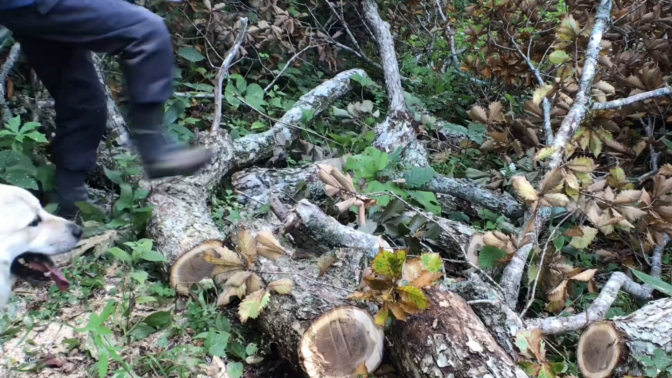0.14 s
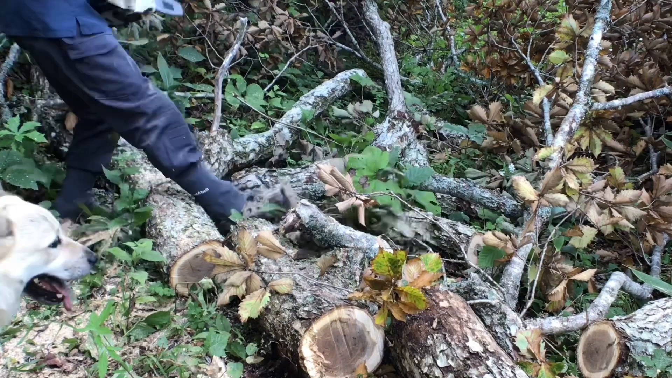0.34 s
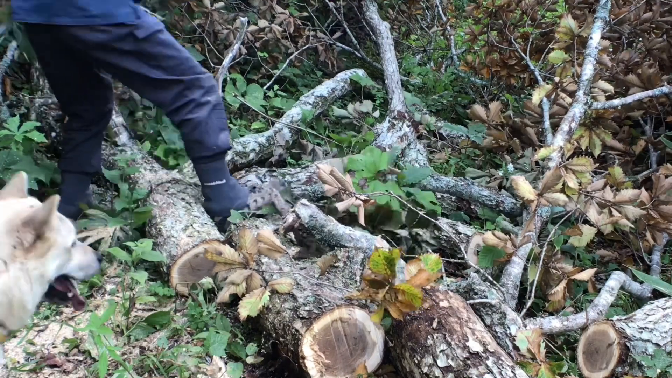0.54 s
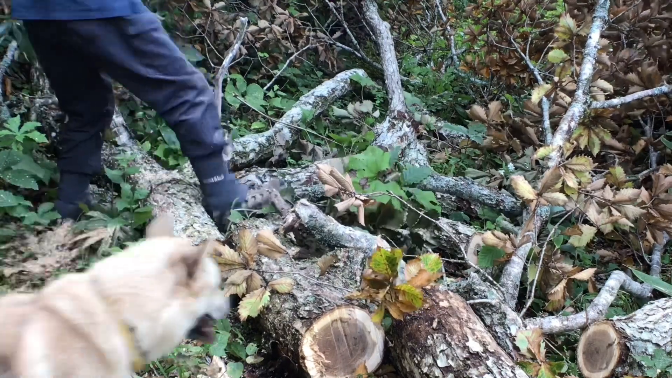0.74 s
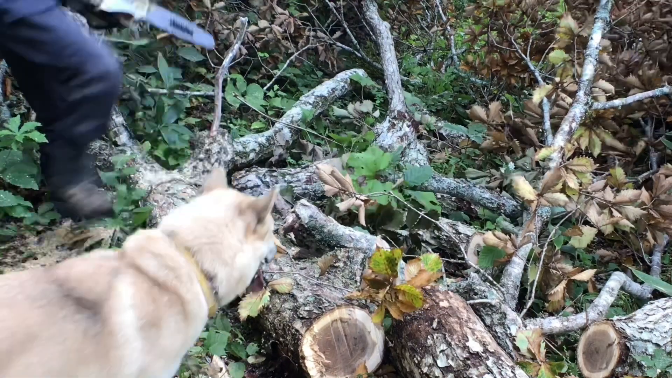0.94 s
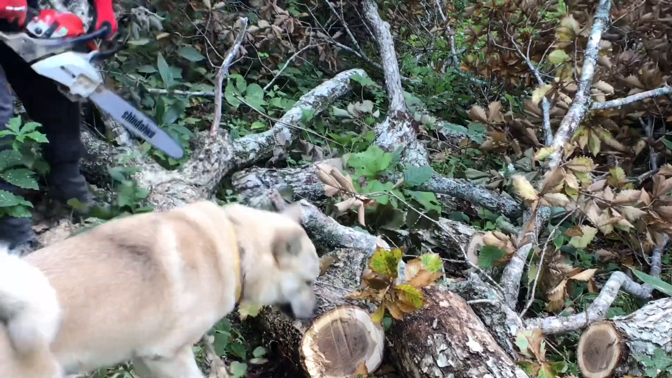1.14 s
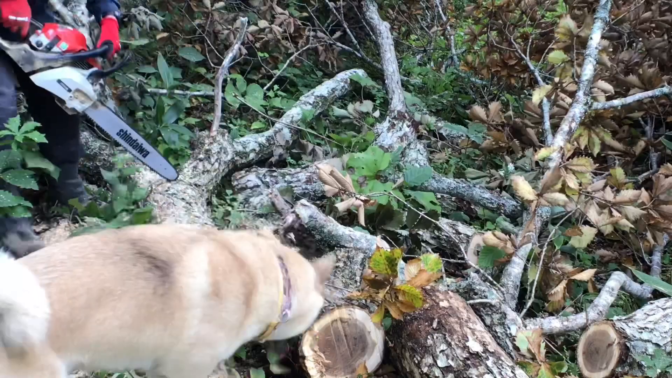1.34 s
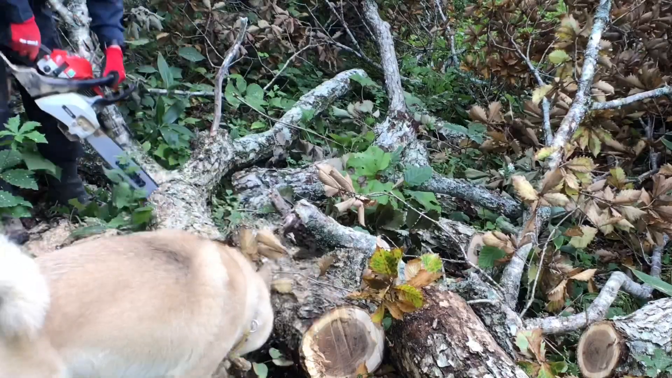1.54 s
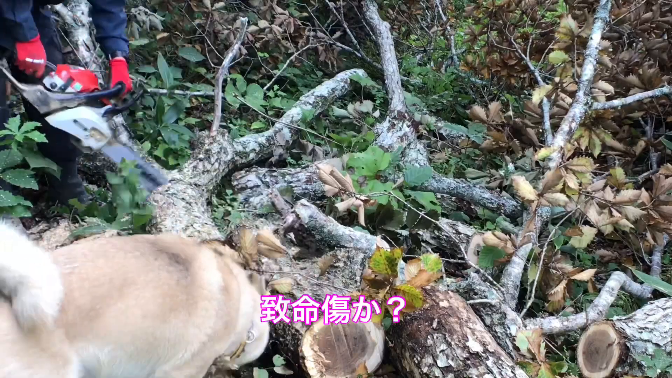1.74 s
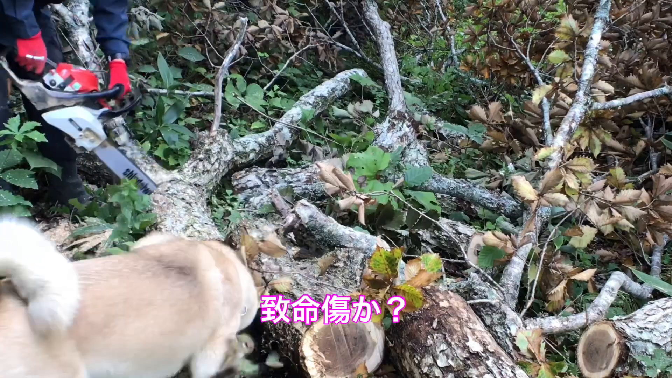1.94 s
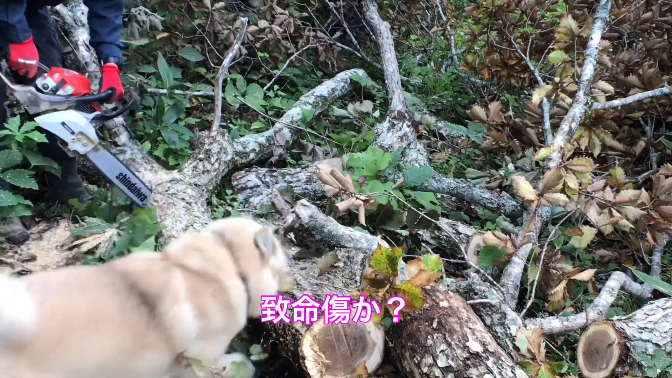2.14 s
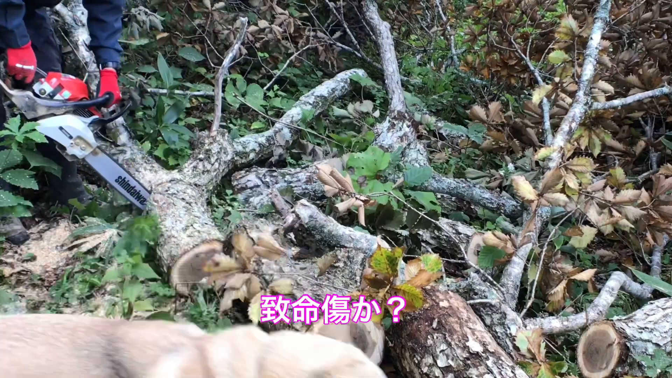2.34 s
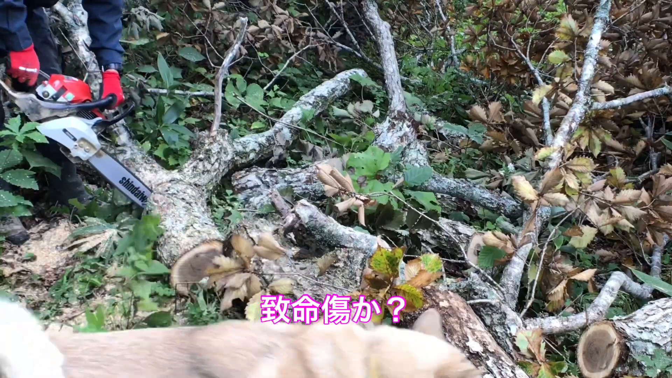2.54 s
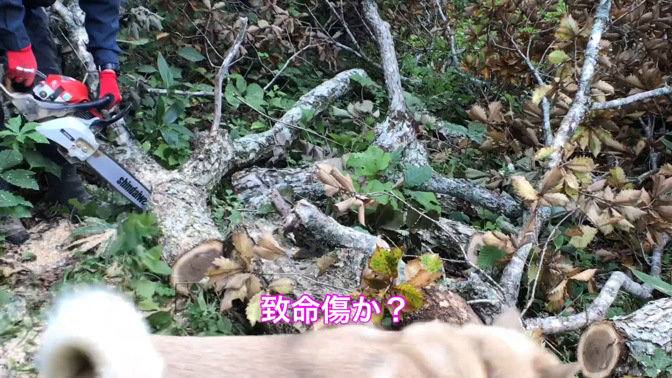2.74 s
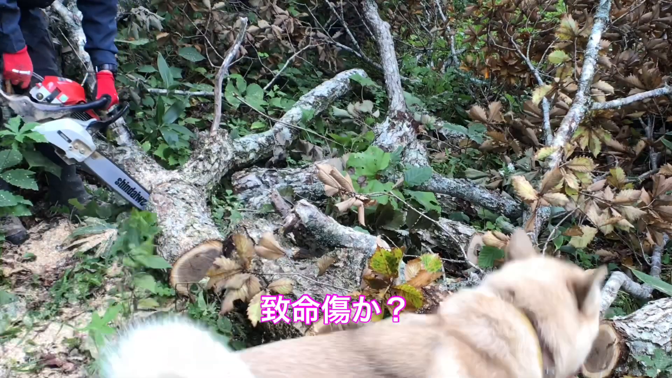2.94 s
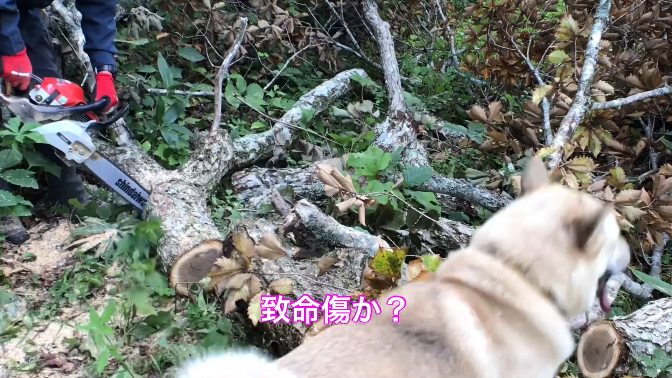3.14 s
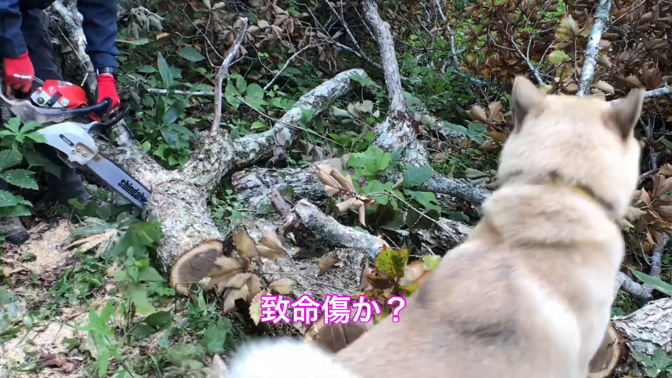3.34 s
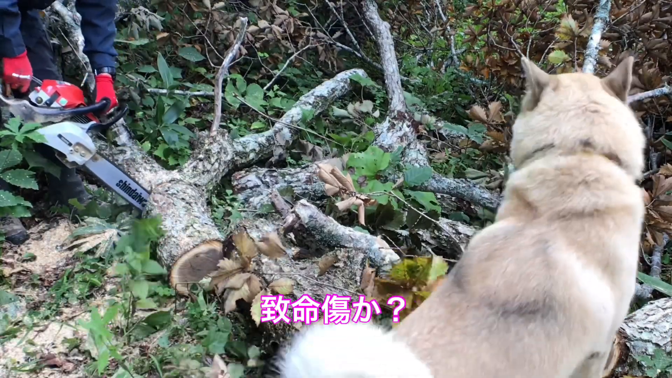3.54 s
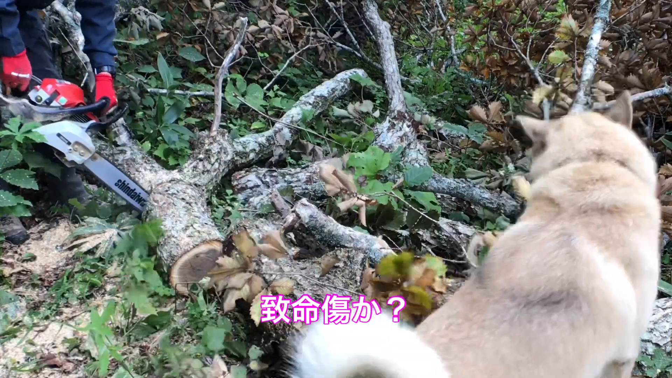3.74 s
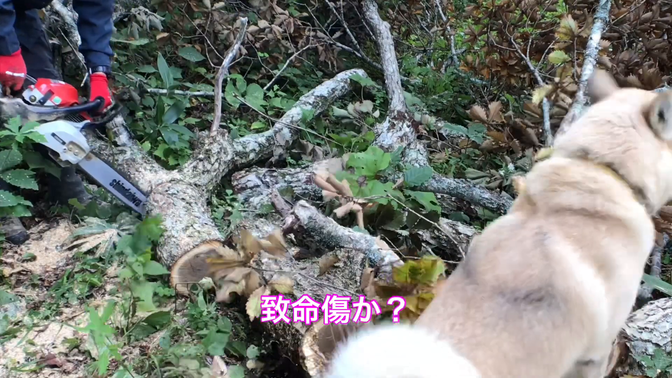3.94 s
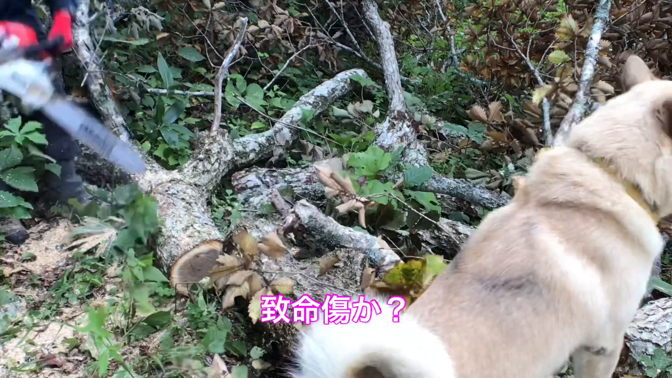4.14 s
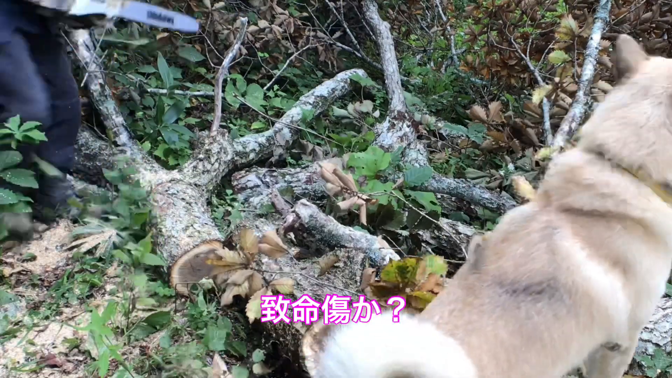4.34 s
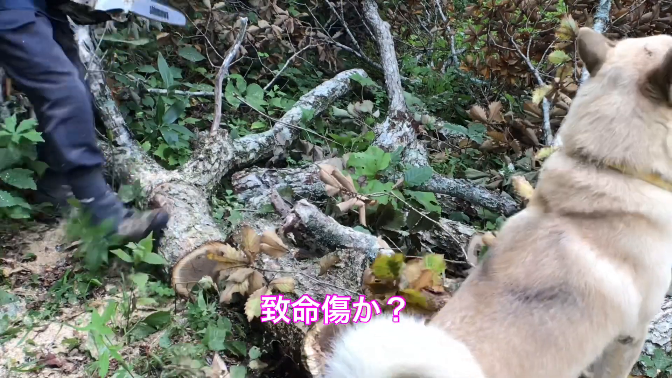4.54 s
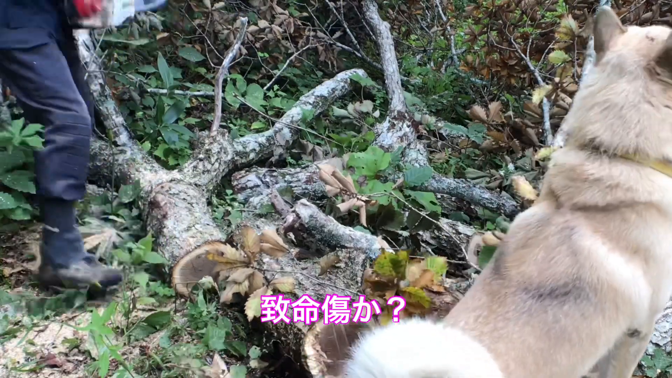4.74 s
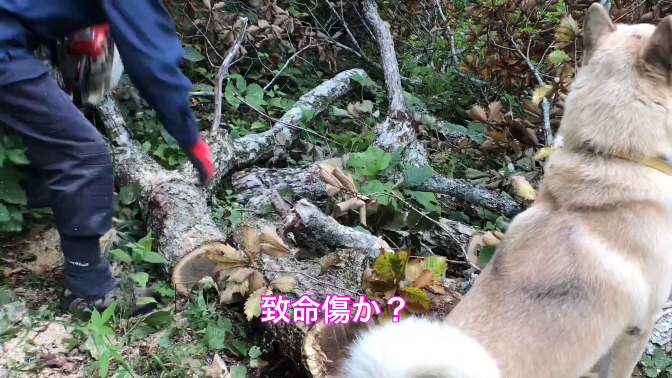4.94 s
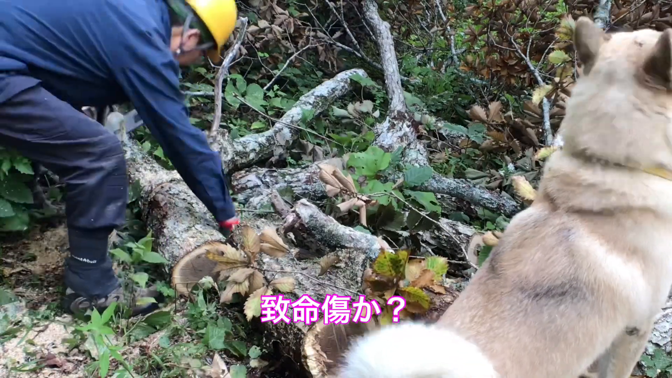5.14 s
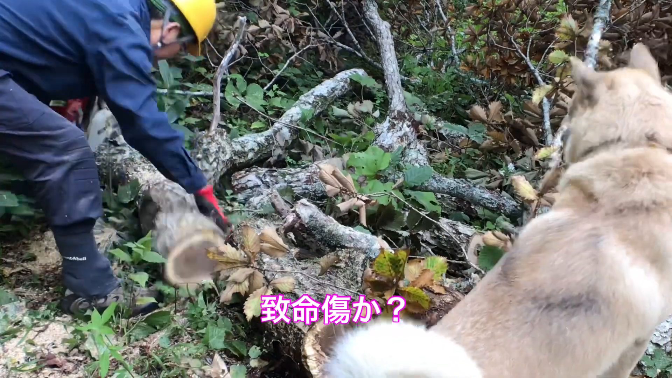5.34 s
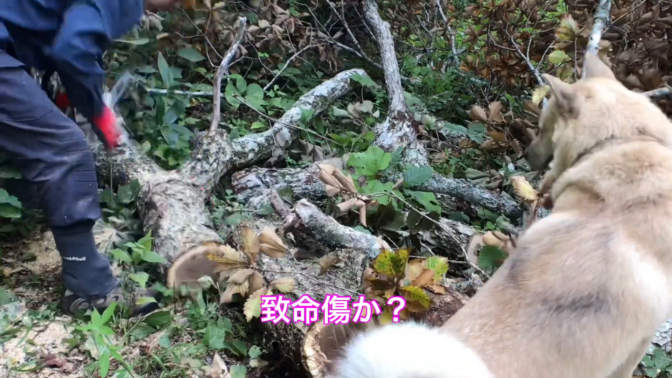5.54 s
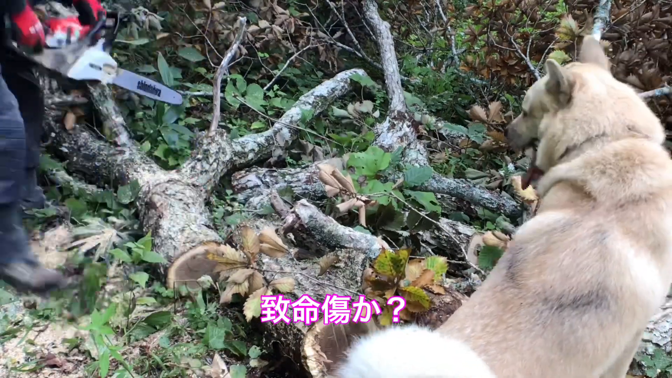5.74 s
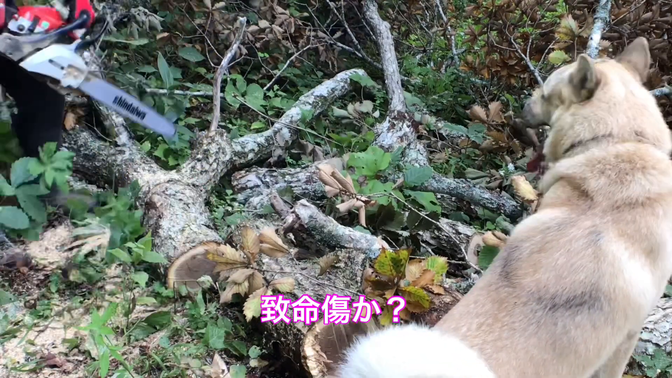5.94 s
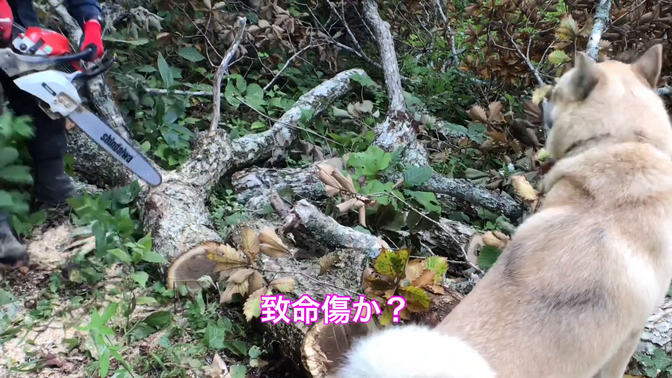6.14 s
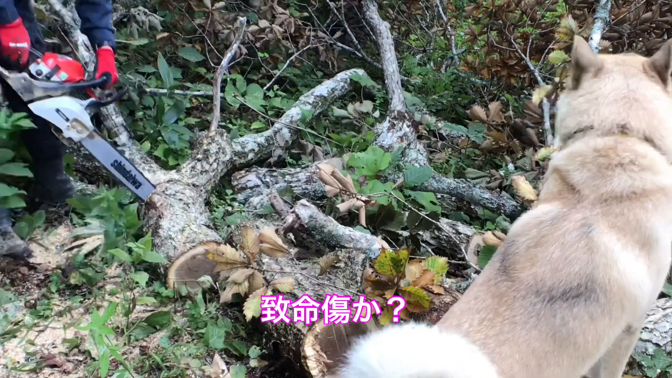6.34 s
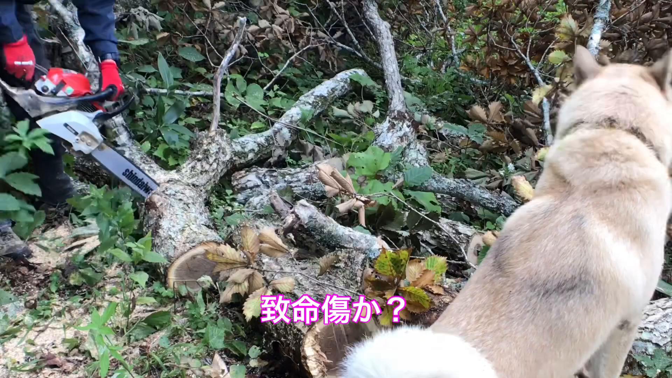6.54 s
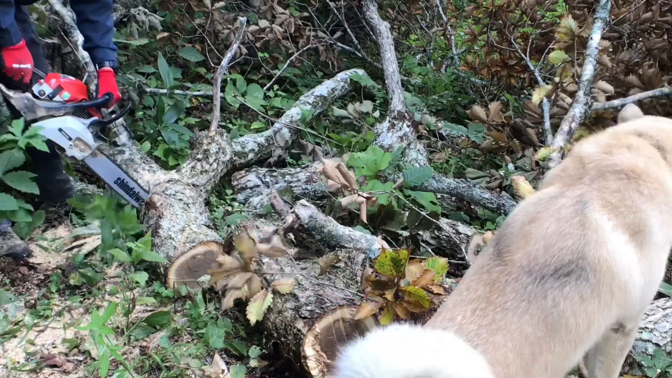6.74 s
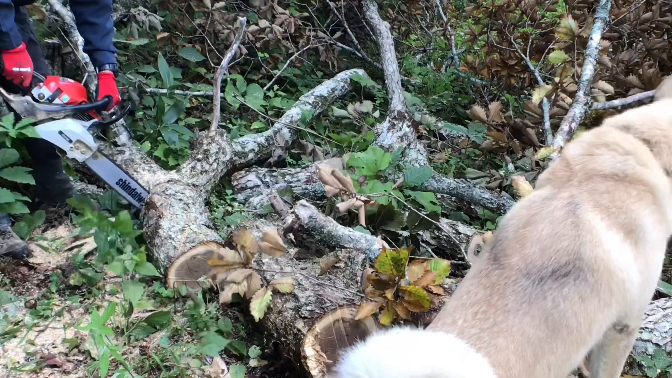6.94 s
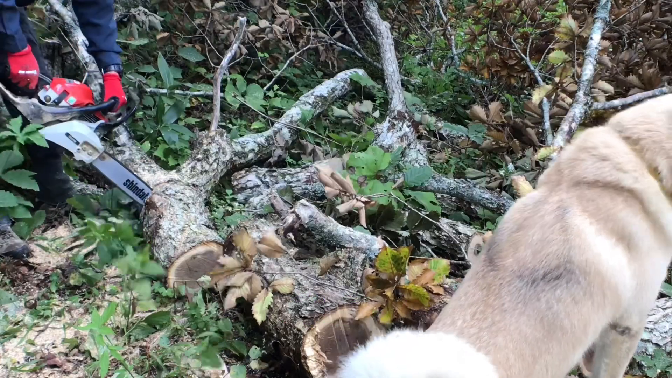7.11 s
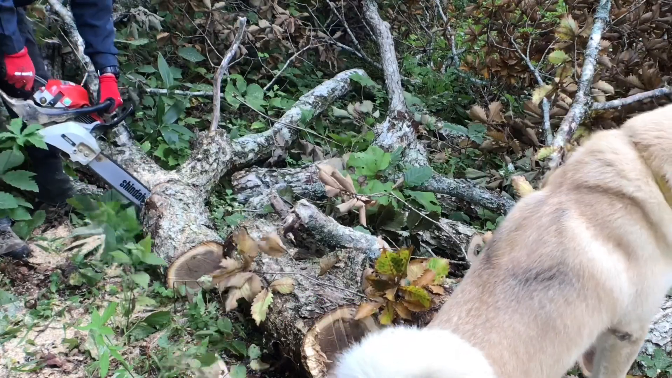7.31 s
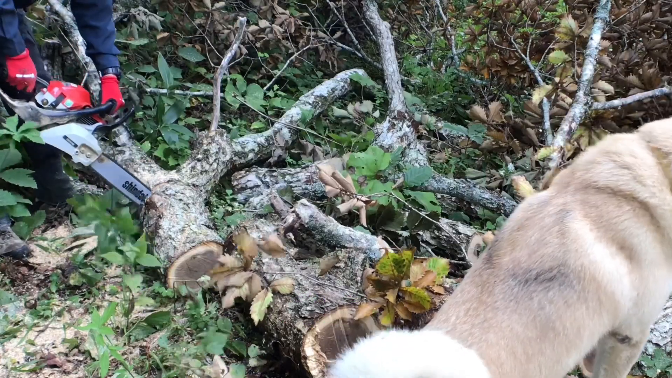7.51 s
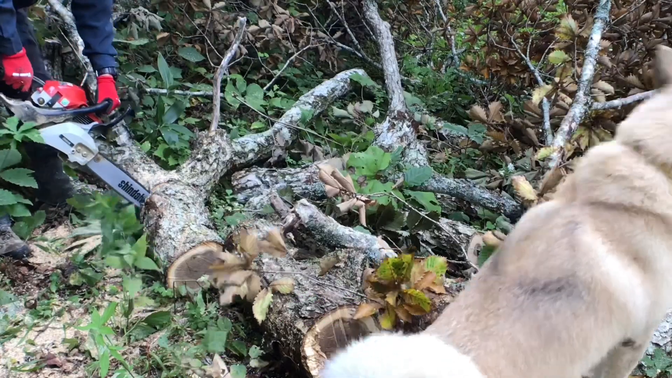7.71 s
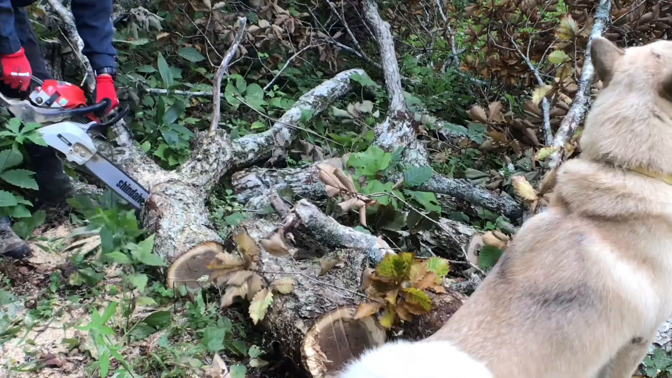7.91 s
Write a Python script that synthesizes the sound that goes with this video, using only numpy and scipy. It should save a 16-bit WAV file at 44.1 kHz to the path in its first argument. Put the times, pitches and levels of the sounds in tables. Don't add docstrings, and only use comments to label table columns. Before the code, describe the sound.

A chainsaw idles near a single microphone, each turn puffing and rattling, with stronger exhaust pops scattered unevenly. A quick run-up leads to a sustained raspy scream with hissing air and chain scrape, wavering slightly under load. The throttle closes and the pitch slides down to a lumpy idle, then it climbs once more and holds. Forest floor and trunks give short, subtle echoes over very quiet air.

```python
import sys
import numpy as np
from scipy import signal
from scipy.fft import rfft, irfft, next_fast_len
from scipy.io import wavfile

SR = 44100
rng = np.random.default_rng(int(sys.argv[2]) if len(sys.argv) > 2 else 0)


def volts_from_decibels(level):
    exponent = np.asarray(level, float) / 20
    return 10 ** exponent


def store_pcm(level_fs):
    pcm = np.round(np.clip(level_fs, -1, 1) * 32767).astype(np.int16)
    wavfile.write(sys.argv[1], SR, np.atleast_2d(pcm).T)


N = 355887


def in_time(rows):
    s, *columns = np.transpose(rows)
    return [np.interp(np.arange(N) / SR, s, c) for c in columns]


def rms_one(x):
    return x / np.sqrt(np.mean(x ** 2) + 1e-20)


def drift(rate_hz):
    r = np.exp(-2 * np.pi * rate_hz / SR)
    return rms_one(signal.lfilter([1], [1, -2 * r, r * r], rng.standard_normal(N + SR))[SR:])


def lowpass(x, hz):
    return signal.sosfilt(signal.butter(2, hz, fs=SR, output="sos"), x)


def log_gain(spectrum, size):
    hz, db = np.transpose(spectrum)
    grid_hz = np.arange(size // 2 + 1) * SR / size
    return np.log(volts_from_decibels(np.interp(np.log(grid_hz + 1), np.log(hz), db)))


def coloured(spectrum):
    size = next_fast_len(N)
    white = rfft(rng.standard_normal(size))
    return rms_one(irfft(white * np.exp(log_gain(spectrum, size)), size)[:N])


def through(x, spectrum, size=4096):
    cepstrum = irfft(log_gain(spectrum, size))
    cepstrum[1:size // 2] *= 2
    cepstrum[size // 2 + 1:] = 0
    return signal.fftconvolve(x, irfft(np.exp(rfft(cepstrum))))[:N]


def resonances(x, modes):
    out = 0
    for k, (hz, width, db) in enumerate(modes):
        r = np.exp(-np.pi * width / SR)
        top = (1 - r * r) / 2 * volts_from_decibels(db) * (-1) ** k
        out = out + signal.lfilter([top, 0, -top], [1, -2 * r * np.cos(2 * np.pi * hz / SR), r * r], x)
    return out


def clicks(at, sizes):
    whole, out = at.astype(int), np.full(N + 2, 1e-18)
    np.add.at(out, whole, sizes * (1 - at + whole))
    np.add.at(out, whole + 1, sizes * (at - whole))
    return out[:N]


# [f/Hz, level/dB per Hz]
WOOD = [(15, -6), (30, 0), (60, -11), (200, -6), (2000, -7), (15000, -49)]


def wood_air():
    level_db = -40.5
    return volts_from_decibels(level_db) * coloured(WOOD)


def trees(x):
    dull, out = signal.lfilter([.3], [1, -.7], x), np.zeros(N)
    for lag in (rng.uniform(0.011, 0.075, 8) * SR).astype(int):
        out[lag:] += dull[:-lag] * np.exp(-lag / SR / 0.034) * rng.choice([-1, 1])
    return out


# [t/s, delay/ms, echo level/dB, highs level/dB]
GROUND = [(0, 0.92, -4.5, -4.5), (1.0, 0.92, -3.5, -19), (1.2, 0.95, -5, -3.5), (1.38, 0.69, -16, -4.5),
          (1.5, 0.51, -7, -3.5), (1.65, 0.52, 1.5, -5), (1.9, 0.57, -5, -4), (4.2, 0.51, -10, -3.5),
          (4.55, 0.88, -2.5, -9), (5.0, 0.87, -2.5, -7.5), (5.2, 0.51, -1.5, -20), (5.62, 0.51, -3, -5),
          (5.8, 0.83, -3.5, -17), (6.02, 0.91, -2.5, -9), (6.09, 0.72, -13, -8), (6.5, 0.53, -1, -2),
          (6.7, 0.56, -4.5, -2.5), (8.07, 0.56, -7.5, -4.5)]


def ground(x, share):
    delay_ms, echo_db, highs_db = in_time(GROUND)
    shade = 1 - volts_from_decibels(np.minimum(highs_db, 0))
    x = x + share * shade * (lowpass(x, 1900) - x)
    late = np.interp(np.arange(N) - delay_ms * SR / 1000, np.arange(N), x)
    return x + share * volts_from_decibels(echo_db) * signal.lfilter([.5], [1, -.5], late)


# [f/Hz, level/dB per Hz]
HISS = [(2500, -39), (4500, -13), (6000, 0), (7000, -1), (8500, -6.5), (9800, -7), (11700, -3.5),
        (13500, -9.5), (15000, -25), (15700, -16.5)]
# [f/Hz, level/dB per Hz]
CHAIN = [(300, -76), (1000, -20.5), (1500, -3), (2000, -0.5), (2800, 0.5), (4000, 3), (5000, 1.5),
         (6500, -4.5), (9000, -35)]


def fan_and_chain(speed):
    fan = coloured(HISS)
    dull = lowpass(fan, 9000)
    fan = dull + np.clip(speed / 220, 0, 1) * (fan - dull)
    return fan + volts_from_decibels(3) * (speed / 400) ** 0.55 * coloured(CHAIN)


def gusts(angle, hiss_db, firings):
    burst = signal.lfilter([1], [1, -np.exp(-1 / (0.0035 * SR))], firings)
    each_turn = np.exp(0.092 * np.cos(2 * np.pi * (angle - .05)))
    return volts_from_decibels(hiss_db + 2) * each_turn * volts_from_decibels(1.1 * drift(15)) + volts_from_decibels(-20.5) * burst


# [f/Hz, width/Hz, level/dB]
CASING = [(5548, 107, 21.5), (5270, 480, 14.5), (7040, 86, 11), (8320, 45, 10.5), (3430, 200, -31),
          (4830, 57, -12), (9180, 380, 2), (11300, 1000, -4)]


def casing_rattle(angle, luck):
    turn = np.clip(angle.astype(int) - int(angle[0]), 0, len(luck) - 1)
    knock = np.exp(1.1 * np.cos(2 * np.pi * (angle + .2))) * volts_from_decibels(2.2 * luck[turn])
    return rms_one(resonances(rms_one(knock) * rng.standard_normal(N), CASING))


# [f/Hz, level/dB per Hz]
RUSH = [(150, -47), (400, 4), (800, 8.5), (1500, 3.5), (2500, -9.5), (3500, -37), (8000, -72)]


def exhaust_rush(angle, speed, puff_db):
    port = np.exp(1.8 * np.cos(2 * np.pi * (angle - .08)) - 1.2)
    return volts_from_decibels(puff_db - 12) * coloured(RUSH) * port * (100 / speed)


WHINE_DB = [-14, -1, 0, 2, -1, 1, -3, -7, -5, -9, -12, -12]
# [f/Hz, width/Hz, level/dB]
COVER = [(1100, 300, -6), (1620, 300, -1), (1990, 200, 2), (2500, 170, 5), (2900, 150, 3), (3230, 220, 0),
         (3740, 160, 3), (4500, 260, -3), (5500, 400, -4)]


def whine(angle, speed):
    lowest_order, slip = 3, .05
    caught = np.clip((speed - 130) / 90, 0, 1)
    swell_db = [2.5 * drift(8) for order in WHINE_DB]
    lines = 0
    for k, db in enumerate(WHINE_DB):
        turns = (k + lowest_order) * angle + rng.random() + slip * swell_db[k - 1]
        lines = lines + volts_from_decibels(db + swell_db[k]) * np.sin(2 * np.pi * turns)
    return resonances(caught * lines, COVER)


def first_order(angle, speed, order_db):
    return volts_from_decibels(order_db - 1.0) * np.clip(speed / 180, 0, 1) * np.sin(2 * np.pi * (angle - .3))


# [f/Hz, level/dB]
INTAKE = [(100, -37), (400, -6), (800, 0.5), (1150, -6.5), (1500, -2), (2100, -4), (2700, -1.5),
          (3300, -27), (5000, -7), (12000, -54.5)]


def intake_puffs(at, puff_db, uneven, luck):
    sizes = volts_from_decibels(puff_db[at.astype(int)] + 0.5 * uneven * luck) * np.sqrt(uneven)
    return volts_from_decibels(34.0) * through(clicks(at, sizes), INTAKE)


# [f/Hz, level/dB]
MUFFLER = [(60, -15.5), (100, 4), (170, 2), (300, 5.5), (550, 0), (900, -0.5), (1400, 1), (1900, -5),
           (2500, 6), (3100, -5), (3500, -20), (5000, -40), (12000, -47)]
# [f/Hz, level/dB]
BARK = [(60, -6), (130, 3), (270, 3.5), (640, 12.5), (950, -1), (1340, 4), (1700, 9.5), (1870, 6.5),
        (2250, 12), (2540, 10), (3300, -2.5), (4400, -4.5), (6000, 0.5), (12000, -54)]


def muffler_pops(putts, barks):
    return -volts_from_decibels(25.5) * through(putts, MUFFLER) - volts_from_decibels(17) * through(barks, BARK)


# [t/s, level/dB]
NEAR = [(0, -0.5), (.5, -2.5), (1.0, -2), (1.3, 2), (1.5, 0), (1.66, -2.5), (1.8, 1.5), (4.1, 1), (4.7, 4),
        (4.95, -4.5), (5.2, -2), (5.65, -2), (5.8, 2), (6.1, 1.5), (6.5, 2), (6.6, 1), (8.07, 1)]
# [speed/turns per s, first order level/dB, puff level/dB, rattle level/dB, hiss level/dB]
OPEN = [(95, -27, -18, -31, -54), (152, -26, -15, -30, -31), (214, -23.5, -15.5, -43, -40),
        (250, -24.5, -16.5, -35, -38), (342, -17.5, -22.5, -23, -33.5), (385, -17, -22, -27, -32.5),
        (417, -20.5, -15, -26.5, -33.5)]
# [speed/turns per s, then the same four levels/dB]
SHUT = [(88, -28.5, -26, -30, -51), (108.3, -43, -26, -34.5, -42), (129, -37, -26.5, -35.5, -36.5),
        (178, -37, -23.5, -36, -39.5), (259, -33, -23.5, -30.5, -36), (388, -30, -14, -23, -33)]


def levels(speed, throttle):
    def by_speed(law):
        at_speed, *columns = np.transpose(law)
        return np.array([np.interp(speed, at_speed, c) for c in columns])
    order_db, puff_db, rattle_db, hiss_db = throttle * by_speed(OPEN) + (1 - throttle) * by_speed(SHUT)
    near, = in_time(NEAR)
    loose = np.clip(120 / speed, .3, 1)
    rattle_db = rattle_db + 2.0 * near + 1.5 * loose * drift(7.7)
    hiss_db = hiss_db + 0.73 * near + 0.5 * loose * drift(1.7)
    return order_db + near, puff_db + 0.52 * near, rattle_db, hiss_db


# [t/s, peak level/dB]
IDLE_FIRST = [(.0414, -16), (.0916, -15), (.1423, -13), (.2032, -12), (.2835, -13), (.3784, -13),
              (.4101, -14), (.5452, -12), (.5855, -14), (.6978, -14), (.8094, -14), (.879, -14),
              (.9948, -12), (1.0705, -13), (1.1557, -11), (1.2386, -10), (1.2786, -9), (1.3188, -10),
              (1.3591, -10), (1.4215, -10), (1.4613, -11), (1.4924, -10), (1.6084, -15), (1.6758, -12),
              (1.6965, -10), (1.715, -11)]
# [t/s, peak level/dB]
IDLE_SECOND = [(4.8475, -15), (5.0141, -14), (5.1128, -15), (5.2443, -13), (5.3707, -13), (5.4101, -15),
               (5.4909, -14), (5.5413, -13), (5.6014, -13), (5.641, -15), (5.7128, -14), (5.7731, -12),
               (5.8036, -10), (5.8545, -12), (5.9284, -12), (5.9702, -13), (6.0644, -9), (6.1035, -8),
               (6.1895, -9), (6.2285, -9), (6.3173, -9), (6.3465, -9), (6.3848, -10), (6.4229, -12),
               (6.5124, -10), (6.529, -11)]


def idle_strength(times, speed, luck):
    breath_db, weak_db, weak_spread_db, turns_per_firing = -25.5, 5.5, -2, 3
    near = np.interp(times, *np.transpose(NEAR))
    size = volts_from_decibels(breath_db + 0.92 * near) * np.clip((135 - speed) / 30, 0, 1)
    for strong in IDLE_FIRST, IDLE_SECOND:
        turns = [np.argmin(abs(times - s)) for s, db in strong]
        db = np.transpose(strong)[1]
        for last, this in zip(turns, turns[1:]):
            count = max(round((this - last) / turns_per_firing), 1)
            between = np.linspace(last, this, count, endpoint=False).round().astype(int)
            size[between] = volts_from_decibels(np.interp(between, turns, db) - weak_db + weak_spread_db * luck[between])
        size[turns] = volts_from_decibels(db - 3.5)
    return size


def crank_angle(speed):
    turns = np.cumsum(speed) / SR
    at = np.array(IDLE_FIRST + IDLE_SECOND)[:, 0] * SR - 6
    hunt = np.unwrap(-np.interp(at, np.arange(N), turns) % 1, period=1)
    return turns + np.interp(np.arange(N), at, hunt)


# [t/s, speed/turns per s]
IDLING = [(0, 101.5), (.36, 94.5), (.56, 98.5), (.82, 100), (.95, 93.5), (1.15, 94.4), (1.28, 99.4),
          (1.5, 97.5), (1.66, 89.5), (4.99, 87.5), (5.2, 91.5), (5.39, 99.7), (5.82, 98.5), (5.98, 95),
          (6.11, 106), (6.25, 101.5), (6.4, 103.5), (6.5, 97)]
# [t after the pull/s, speed/turns per s]
PULL = [(0, 70), (.02, 119), (.06, 182), (.09, 212), (.17, 244), (.26, 326), (.31, 368), (.35, 390),
        (.44, 422)]
# [pulled t/s, pace of the run-up (time stretch), let go t/s]
TRIGGER = [
    (1.69, 1.0, 4.172),
    (6.503, .79, 9),
]
# [t/s, speed/turns per s]
CUT_SPEED = [(2.12, 417.5), (2.31, 401), (2.63, 406.5), (2.82, 398), (3.44, 403.5), (3.53, 393.5),
             (3.59, 409), (3.7, 394), (4.17, 397),
             (6.87, 419.5), (7.07, 399.5), (7.17, 401), (7.31, 415.5), (7.44, 400.4), (7.6, 407),
            (7.66, 399), (7.9, 396.5), (8.07, 407)]


def crank_speed():
    coast_s, trigger_lag_s = .43, 0.013
    t, (held,) = np.arange(N) / SR, in_time(CUT_SPEED)
    held = held * (1 + .002 * drift(9.35))
    driven, pulled = np.zeros(N), np.zeros(N)
    for pull, pace, let_go in TRIGGER:
        run = np.minimum(np.interp((t - pull) / pace, *np.transpose(PULL), left=0), held)
        driven = np.maximum(driven, run * np.exp(-np.maximum(t - let_go, 0) / coast_s))
        pulled += (t > pull) & (t < let_go)
    r = np.exp(-1 / (trigger_lag_s * SR))
    speed = (in_time(IDLING)[0] ** 8 + driven ** 8) ** (1 / 8)
    return speed, signal.lfilter([1 - r], [1, -r], pulled)


# [from t/s, to t/s, pop level/dB, rise/s]
LIMITED = [
    (2.09, 3.545, -10, .05),
    (3.57, 4.172, -10, .015),
    (6.825, 7.56, -10, .04),
    (7.58, 8.07, -10, .015),
]
# [t/s, shift/turns]
SLIPS = [(2.18, 1), (2.265, 1), (2.365, 1), (2.405, 1), (2.415, -1), (2.92, 1), (3.405, -1), (3.415, 1),
         (3.435, 1), (3.45, 1), (3.64, 1), (3.79, -1), (3.8, 1), (3.855, 1), (7.075, 1), (7.29, -1),
         (7.535, 1), (7.82, 1), (8.05, -1)]
# [speed/turns per s, level/dB]
POP = [(95, -23), (150, -14.5), (217, -17.5), (280, -14.5), (330, -20), (370, -33), (405, -20.5)]


def firing_strength(times, speed):
    count = np.arange(len(times)) - sum(late * (times > s) for s, late in SLIPS)
    free = sum((times > pull) * (times < let_go) for pull, pace, let_go in TRIGGER)
    size = 0
    for start, end, db, rise in LIMITED:
        grown = np.clip((times - start) / rise, 0, 1) * (times < end)
        free = free - grown
        size = size + volts_from_decibels(db) * grown * (count % 3 == 0)
    return size + np.clip(free, 0, 1) * volts_from_decibels(np.interp(speed, *np.transpose(POP)))


def saw():
    speed, throttle = crank_speed()
    order_db, puff_db, rattle_db, hiss_db = levels(speed, throttle)
    angle = crank_angle(speed)
    at = np.interp(np.arange(np.ceil(angle[0]), angle[-1]), angle, np.arange(N))
    chance = rng.standard_normal((len(at), 4))
    turn_speed = speed[at.astype(int)]
    uneven = 100 / turn_speed
    at = np.clip(at + .4 * chance[:, 0], 0, N - 1)
    putts = clicks(at, idle_strength(at / SR, turn_speed, chance[:, 0]) * volts_from_decibels(0.2 * chance[:, 1]))
    barks = clicks(at, firing_strength(at / SR, turn_speed) * volts_from_decibels(.3 * chance[:, 1]))

    noise = gusts(angle, hiss_db, putts + barks) * fan_and_chain(speed)
    noise += volts_from_decibels(rattle_db - 5.0) * casing_rattle(angle, chance[:, 3])

    engine = exhaust_rush(angle, speed, puff_db)
    slack_db = -1 * (1 - throttle)
    engine += volts_from_decibels(hiss_db + 7 + slack_db) * whine(angle, speed)
    engine += first_order(angle, speed, order_db)
    engine += intake_puffs(at, puff_db, uneven, chance[:, 2])
    engine += muffler_pops(putts, barks)
    return engine, noise


def scene():
    engine, noise = saw()
    near = ground(engine, share=1) + ground(noise, share=.2)
    mono = near + volts_from_decibels(-39.0) * trees(near) + wood_air()
    return np.array([mono, mono])


def roll_off(x):
    return signal.sosfilt(signal.butter(12, 15730, fs=SR, output="sos"), x)


def record(dry):
    x = signal.sosfilt(signal.butter(4, 99, "high", fs=SR, output="sos"), dry)
    return roll_off(1.374 * np.tanh(x / 1.21))


dry = scene()
out = record(dry)
store_pcm(out)
```